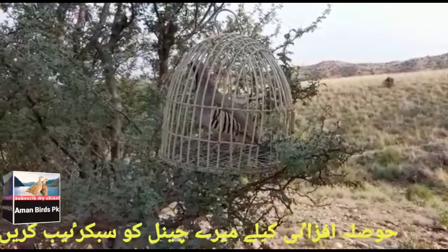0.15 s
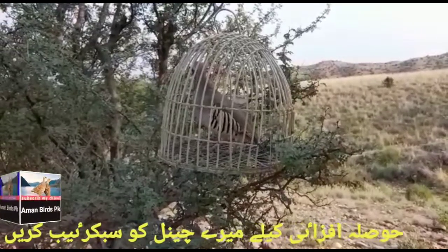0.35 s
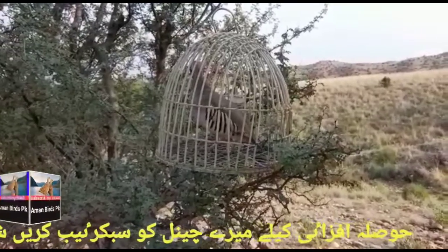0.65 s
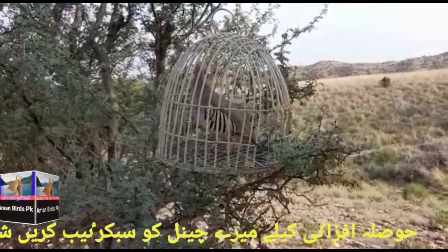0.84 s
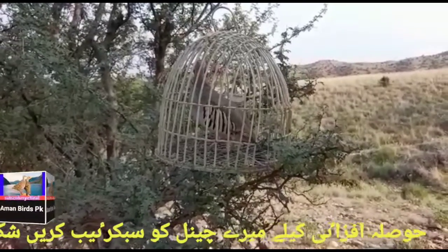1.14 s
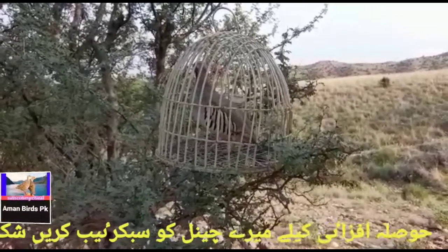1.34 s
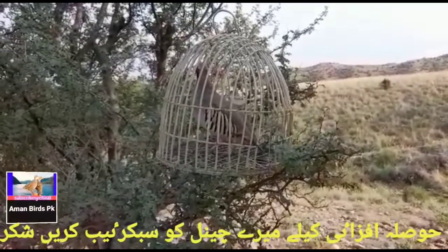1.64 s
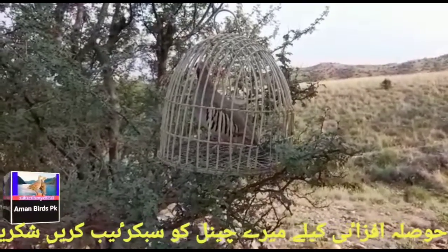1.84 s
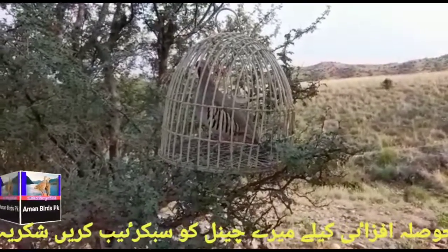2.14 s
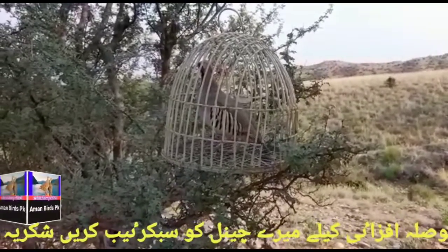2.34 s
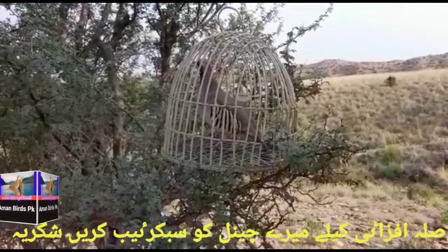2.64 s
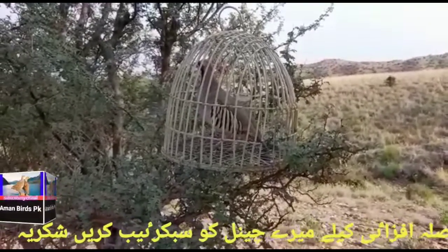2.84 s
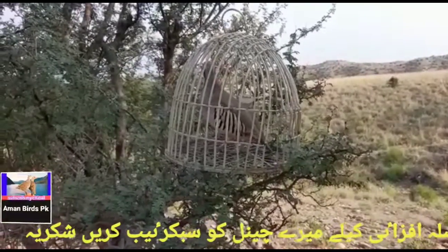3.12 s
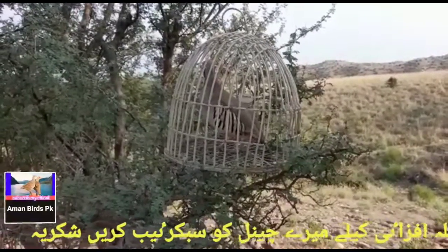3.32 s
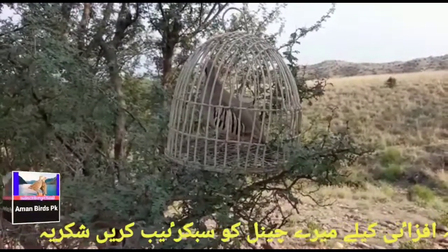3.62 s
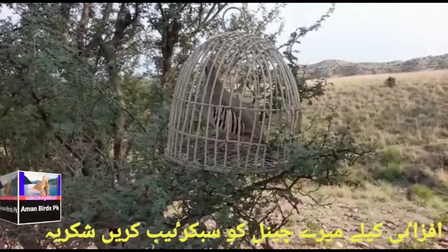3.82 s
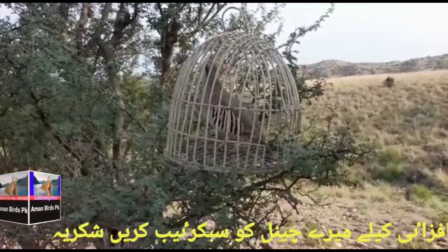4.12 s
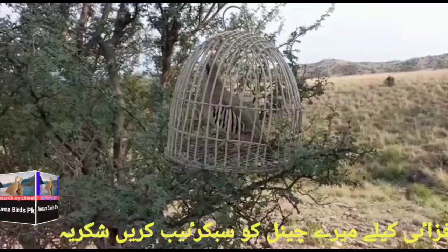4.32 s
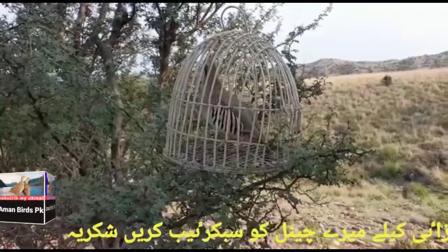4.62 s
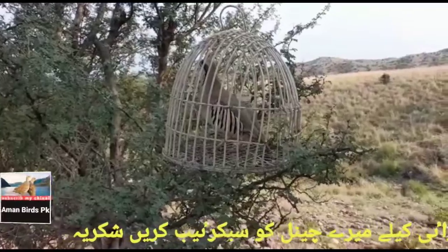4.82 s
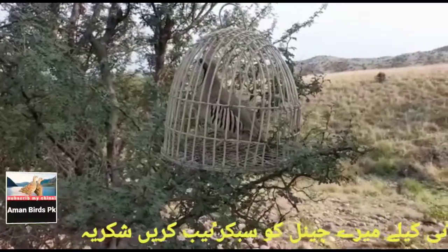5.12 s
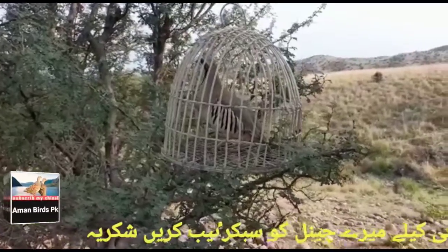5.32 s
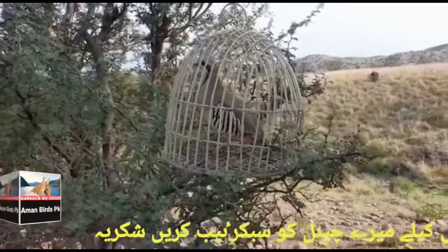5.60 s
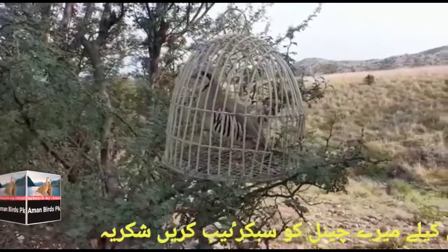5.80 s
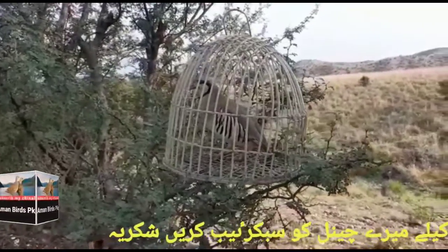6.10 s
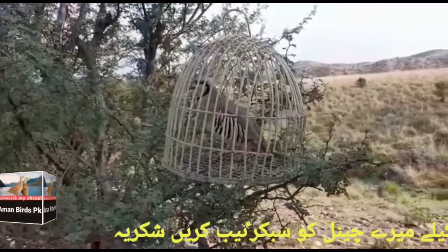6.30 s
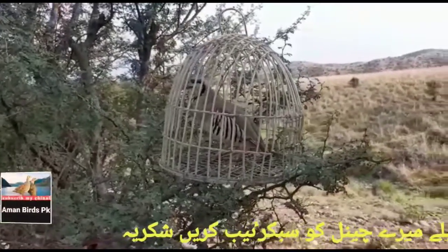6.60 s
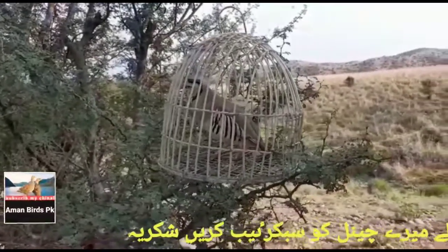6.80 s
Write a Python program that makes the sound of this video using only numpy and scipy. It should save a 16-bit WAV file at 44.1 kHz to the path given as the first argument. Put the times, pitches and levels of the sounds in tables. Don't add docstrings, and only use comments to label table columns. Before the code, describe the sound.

On an open hillside, a caged partridge very close on the right utters loud, rasping notes in a quick, regular rhythm, around six a second, growing hoarser and slightly overloading the microphone. A second partridge at middle distance clucks in pairs and broken notes, strong at first, then moving off and stopping. Thin small-bird whistles, faint far clucks and low wind puffs sit behind.

```python
import sys
import numpy as np
from scipy import signal
from scipy.fft import rfft, irfft, next_fast_len
from scipy.io import wavfile
from scipy.ndimage import uniform_filter1d, minimum_filter1d

SR = 44100
rng = np.random.default_rng(int(sys.argv[2]) if len(sys.argv) > 2 else 0)


def inscribe(sig):
    pcm = np.round(np.clip(np.atleast_2d(sig).T, -1, 1) * 32767)
    wavfile.write(sys.argv[1], SR, pcm.astype(np.int16))


def volts_from_db(level):
    exponent = np.asarray(level, float) / 20
    return 10 ** exponent


N = 306495
T = np.arange(N) / SR


def amp_one(x):
    return x / np.sqrt(np.mean(x ** 2) + 1e-20)


def butter(x, hz, kind, order=2):
    return signal.sosfilt(signal.butter(order, hz, kind, fs=SR, output="sos"), x)


def drift(rate_hz):
    settle = 9000
    return amp_one(butter(rng.standard_normal(N + settle), rate_hz, "low")[settle:])


def turns(hz):
    return 2 * np.pi * np.cumsum(hz * np.ones(N)) / SR


def resonance(x, hz, width_hz):
    carrier = np.exp(1j * turns(hz))
    band = butter(x / carrier, width_hz / 2, "low", order=3)
    return (band * carrier).real / np.sqrt(width_hz / SR)


def phrase(notes, attack_s, onset_db, fall_share, end_db):
    gain, rows = np.zeros(N), np.array(notes)
    for start_s, length, level_db, _, _, slope_db in notes:
        fall_s = length * (1 - fall_share)
        times = start_s + np.array([0, .003, attack_s, .3 * length, fall_s, length, length + .012])
        shape_db = [-60, -20, onset_db - slope_db, 1 - slope_db, 1 + slope_db, end_db, end_db - 35]
        span = slice(max(int(times[0] * SR), 0), int(times[-1] * SR))
        gain[span] += volts_from_db(level_db + np.interp(T[span], times, shape_db))
    row = np.maximum(np.searchsorted(rows[:, 0], T) - 1, 0)
    done = np.clip((T - rows[row, 0]) / rows[row, 1], 0, 1.2)
    return gain, done, rows[row].T


def syrinx(pitch_hz, clear, jitter, breath, limp):
    phase = turns(pitch_hz * (1 + jitter * drift(150)))
    cycle = np.floor(phase / (2 * np.pi))
    steady = clear * (1 + limp * drift(20) * (-1) ** cycle)
    chaos = np.sqrt(1 - np.clip(clear, 0, 1) ** 2) * rng.standard_normal(N)
    pulses = amp_one(np.diff(cycle, prepend=0) * (steady + chaos))
    return pulses + breath * rng.standard_normal(N), phase


def evened(x, share):
    power = uniform_filter1d(uniform_filter1d(x ** 2, size=120), size=120)
    return amp_one(x / np.sqrt(power + 0.00074) ** share)


def other_bird(notes, modes, low_db, second_db, hiss_db):
    gain, done, columns = phrase(notes, .006, onset_db=-5, fall_share=.4, end_db=-11)
    _, _, _, pitch, clear, _ = columns
    arch = 1.03 - .2 * (done - .25) ** 2 - .2 * done ** 4
    pulses, phase = syrinx(pitch * arch, clear=clear, jitter=.016, breath=.4, limp=.5)
    sink_hz = 380 * done ** 2.8
    rasp = sum(volts_from_db(mode_db) * resonance(pulses, hz - sink_hz, width_hz) for hz, width_hz, mode_db in modes)
    hiss = np.zeros(N)
    for band_hz, level_db in [([7900, 11000], -2), ([11500, 14600], 8)]:
        band = butter(rng.standard_normal(N), band_hz, "band", order=3)
        hiss += volts_from_db(level_db + 4.0 * drift(20)) * band
    tone = volts_from_db(low_db) * np.sin(phase) + volts_from_db(second_db) * np.sin(2 * phase)
    return gain * (evened(rasp, share=2 / 3) + tone + volts_from_db(hiss_db) * hiss)


def hillside(x, bush_db, slope_db):
    t = T[:SR // 2]
    bush = volts_from_db(bush_db - 60 * t / 0.073) * rng.standard_normal(len(t))
    slope = volts_from_db(slope_db - 60 * t / 2.0) * butter(rng.standard_normal(len(t)), 2800, "low")
    return x + signal.fftconvolve(x, bush + slope)[:N]


def weather():
    # start_s (peak time), level_db
    gusts = [
        (.1, -52),
        (.45, -72),
        (.8, -60),
        (1.05, -64),
        (6.95, -60),
    ]
    # band_hz, density_db (per Hz)
    air_colour = [(150, -25.5), (300, -6.5), (1600, -13), (2800, -2.5), (3400, -20.5), (5000, -15),
                  (15000, -32), (16000, -56.5)]
    # left_db, right_db
    air_sides_db = [-91.5, -69.5]
    breeze_db, breeze_db_per_s, fade_db_per_s = -85, -.6, 170
    flow = volts_from_db(breeze_db + breeze_db_per_s * T)
    for peak_s, peak_db in gusts:
        flow = flow + volts_from_db(peak_db - fade_db_per_s * np.abs(T - peak_s))
    wind = []
    for side in range(2):
        rumble = amp_one(butter(rng.standard_normal(N), [40, 95], "band", order=3))
        wind.append(volts_from_db(1.5 * drift(6)) * rumble)
    hz, density_db = np.transpose(air_colour)
    bins_hz = np.arange(N // 2 + 1) * SR / N
    colour = volts_from_db(np.interp(np.log(bins_hz + 1), np.log(hz), density_db))
    hush = [amp_one(irfft(rfft(rng.standard_normal(N)) * colour, N)) for side in range(2)]
    return flow * volts_from_db([[3], [-6]]) * wind + volts_from_db(np.c_[air_sides_db]) * hush


def answer_notes():
    # start_s, length_s, level_db, pitch_hz, slope_db (late minus early)
    lone = [
        (0, .031, -22, 504.5, -4.5),
        (2.604, .127, -38, 542.4, 2.5),
    ]
    # start_s, gap_s, level_db, pitch_hz
    pairs = [(0.54, .097, -26, 588), (1.093, .091, -28.5, 573), (1.682, .094, -29, 575),
             (2.267, .098, -33.5, 555), (2.941, .098, -43, 570), (3.622, .107, -39.5, 512),
             (3.982, .104, -40, 560), (4.336, .102, -39.5, 507), (4.694, .108, -40.5, 560)]
    # start_s, lead_s, level_db, lift_db (second half), pitch_hz
    swells = [
        (0.061, .028, -22, 2.5, 570),
        (0.3, .044, -31, 7.5, 590),
        (0.865, .039, -29, .5, 576),
        (1.427, .04, -33.5, 5.5, 576),
        (2.01, .043, -31.5, -1.5, 545),
        (3.281, .092, -39.5, 4, 538),
    ]
    notes = [(s, length, level_db, hz, .5, slope_db) for s, length, level_db, hz, slope_db in lone]
    pair_s, pair_lift_db, pair_clear, pair_slope_db = (.057, .059), 1.0, (.5, .6), (.3, 0.1)
    for s, gap, level_db, hz in pairs:
        levels_db = (level_db, level_db + pair_lift_db)
        notes += zip((s, s + gap), pair_s, levels_db, (hz, hz), pair_clear, pair_slope_db)
    overlap, second_s, swell_clear, swell_slope_db = 1.35, .044, (.4, .4), (1.5, .3)
    for s, lead, level_db, lift_db, hz in swells:
        lengths, levels_db = (overlap * lead, second_s), (level_db, level_db + lift_db)
        notes += zip((s, s + lead), lengths, levels_db, (hz, hz), swell_clear, swell_slope_db)
    return sorted(notes)


def answering_bird():
    # centre_hz, width_hz, level_db
    answer_modes = [(1670, 600, -4.5), (2730, 850, -18.5), (4060, 650, -20.5), (5290, 600, -16),
                    (6000, 2100, -35)]
    clucks = other_bird(answer_notes(), answer_modes, low_db=-12.5, second_db=-8.5, hiss_db=-31)
    return hillside(clucks, -39, -88)


def caged_notes():
    # start_s, level_db, throat_hz (at the start)
    pickups = [(0.929, -12, 1496), (1.413, -14, 1755), (1.913, -13.5, 1834), (2.417, -11, 1776),
               (2.916, -9, 1862), (3.431, -9.5, 1781), (3.962, -10.5, 1835), (4.496, -10, 1784),
               (5.029, -9.9, 1878), (5.579, -12, 1982), (6.131, -15, 1973), (6.735, -15, 1941)]
    # start_s, level_db, throat_hz (at the start)
    stresses = [(1.04, -13, 1664), (1.526, -12, 1693), (2.021, -10, 1660), (2.526, -7, 1773),
                (3.024, -9.5, 1835), (3.539, -8, 1848), (4.071, -8.5, 1785), (4.603, -9, 1862),
                (5.141, -6, 1927), (5.686, -7.5, 1932), (6.243, -11, 1937), (6.853, -10.5, 2013)]
    # start_s, level_db, throat_hz (at the start)
    closes = [(0.748, -14, 1803), (2.233, -10.5, 1835), (2.734, -10.5, 1932), (3.245, -9.5, 1905),
              (3.765, -9, 1894), (4.303, -9, 1889), (4.832, -10.5, 1954), (5.368, -11.5, 2013),
              (5.921, -12, 2024)]
    # start_s, length_s, level_db, throat_hz, slope_db (late minus early)
    loose = [(0.014, 0.065, -16.5, 1557, -8.4), (0.121, 0.041, -16, 1631, -0.2),
             (0.314, 0.056, -12.5, 1656, -1.9), (0.495, 0.066, -10, 1669, 1.5),
             (0.554, 0.053, -12, 1673, 0.2), (1.24, .066, -12.5, 1697, -2.3),
             (1.732, .059, -10.5, 1772, .5), (6.47, 0.069, -12, 2028, 1.8), (6.533, 0.043, -12.5, 1842, -1)]
    kinds = [(pickups, (.058, .0006, .0075, 0.0003, 1.6)),
             (stresses, (.078, .0008, .002, .0027, -.3)),
             (closes, (.063, .002, .015, .0001, -3.0))]
    notes = [(s, length, level_db, hz, 0, slope_db) for s, length, level_db, hz, slope_db in loose]
    for rows, (length, grows, whistle, clears, slope_db) in kinds:
        for s, level_db, hz in rows:
            notes.append((s, length + grows * s, level_db, hz, whistle + clears * s, slope_db))
    return sorted(notes)


def caged_bird():
    # start_s, pitch_hz, beak_hz, push_db (breath)
    bout = [(0, 560, 5250, -54), (.6, 559, 5135, -58), (.9, 558, 4450, -65), (2, 600, 4307, -48),
            (3, 642, 4504, -38), (5, 640, 4490, -36.5), (5.6, 638, 4806, -36), (6.3, 619, 4624, -35),
            (6.95, 619, 5180, -38)]
    # centre_hz, width_hz, level_db
    near_side_modes = [(2757, 250, -25), (6415, 1200, -44), (742, 546, -35.5)]
    times, *columns = np.transpose(bout)
    pitch, beak_hz, push_db = [np.interp(T, times, column) for column in columns]
    gain, done, note = phrase(caged_notes(), 0.0053, onset_db=-4, fall_share=0.26, end_db=-14)
    start, length, _, open_hz, whistle_s, _ = note

    glide = np.where(length < .073, .3, .13) * np.interp(T, [1.2, 2.4], [.45, 1])
    bend = .96 + glide * (1 - 2 * done) - .3 * done ** 7
    pulses, phase = syrinx(pitch * bend, clear=.84, jitter=.016, breath=.3, limp=.7)
    airy = .5 * pulses + rng.standard_normal(N)

    end_hz = 1400 + 20 * T
    bulge = 0.017 * np.sin(np.pi * np.minimum(done / .5, 1))
    throat_hz = open_hz * (1 + bulge + .035 * drift(30)) + (end_hz - open_hz) * done ** 1.04
    upper_db = np.interp(T, [0, 2.5, 4.5, 5.5], [-14.5, -10, -10.5, -6.5])
    throat = resonance(pulses, throat_hz, 486.0)
    throat = throat + volts_from_db(upper_db) * resonance(pulses, 1.3125 * throat_hz, 450.0)
    rasp = butter(throat, 1265, "high", order=4)

    raised_khz = (beak_hz - 4400) / 10 ** 3
    hoarse_s = (4.9, 5.5)
    beak_db = -17 - 9 * raised_khz - 16 * done ** 4
    shrill_db = -12 + 7 * raised_khz + np.interp(T, hoarse_s, (0, 7))
    hiss = resonance(airy, np.interp(T, hoarse_s, (4700, 4950)), 1550)
    rasp = rasp + volts_from_db(beak_db) * (resonance(pulses, beak_hz, 460.0) + volts_from_db(shrill_db) * hiss)
    for hz, width_hz, mode_db in near_side_modes:
        rasp = rasp + volts_from_db(mode_db) * resonance(airy, hz, width_hz)
    hum = volts_from_db(-27 + 4.5 * drift(60)) * np.sin(phase) + volts_from_db(-28.5) * np.sin(2 * phase)
    rasp = evened(rasp, share=.58) + hum

    clear = np.clip((start + whistle_s - T) / .004 + .3, 0, 1) * (whistle_s > .007) * (T > .7)
    sing = turns(open_hz * (1 + .012 * drift(42)))
    whistle = volts_from_db(4.5) * np.sin(sing) + volts_from_db(-26.5) * np.sin(2 * sing) + volts_from_db(-41) * np.sin(3 * sing)
    mixed = clear * whistle + volts_from_db(-.2) * (1 - 0.75 * clear) * rasp
    return gain * butter(mixed, 7200, "low", order=6), volts_from_db(push_db)


def small_bird():
    # start_s, length_s, top_hz, level_db
    whistles = [(0.108, .08, 4750, -64), (0.21, .09, 5030, -72), (0.395, .062, 4680, -71),
                (.6, .04, 4900, -70), (1.55, .1, 4957, -70), (1.965, .06, 4970, -62),
                (2.319, .062, 4900, -60), (2.79, .09, 5015, -70), (3.87, .014, 4323, -74),
                (3.9, .05, 4910, -84), (4.225, .08, 4900, -71), (5.77, .08, 5020, -68),
                (5.55, .048, 4150, -80.5), (5.87, .05, 4100, -82), (6.04, .07, 4250, -82),
                (6.43, .048, 3950, -79.5), (6.321, .099, 5000, -69), (6.668, .075, 4943, -69.5)]
    out = np.zeros(N)
    for start_s, length, top_hz, level_db in whistles:
        start_hz, end_hz = .925 * top_hz, .975 * top_hz
        u = np.linspace(0, 1, int(length * SR))
        rise = top_hz - (top_hz - start_hz) * (1 - u / .4) ** 2
        fall = top_hz - (top_hz - end_hz) * ((u - .4) / .6) ** 3
        tone = np.sin(2 * np.pi * np.cumsum(np.where(u < .4, rise, fall)) / SR)
        out[int(start_s * SR):][:len(u)] += volts_from_db(level_db) * np.sin(np.pi * u) ** .6 * tone
    return hillside(out * volts_from_db(1.5 * drift(40)), -34.5, -73)


def distant_bird():
    # start_s, level_db, pitch_hz
    far_clucks = [(2.18, -75.5, 631.5), (4.94, -77.5, 500), (5.28, -79, 496), (5.52, -79, 500),
                  (5.81, -77.5, 500), (6.02, -74.5, 500), (6.445, -86, 512), (6.585, -75, 560),
                  (6.68, -74.5, 520)]
    # centre_hz, width_hz, level_db
    distant_modes = [(1100, 540, 15), (2200, 500, -3.5)]
    length_s, clear, slope_db = .05, .7, 3.0
    notes = [(s, length_s, level_db, hz, clear, slope_db) for s, level_db, hz in far_clucks]
    return other_bird(notes, distant_modes, low_db=-2.5, second_db=1.0, hiss_db=-58.5)


def twig():
    # start_s, level_db (peak)
    ticks = [
        (5.009, -39.5),
    ]
    clicks = np.zeros(N)
    for start_s, level_db in ticks:
        clicks[int(start_s * SR):][:60] = volts_from_db(level_db - .5 * np.arange(60)) * rng.standard_normal(60)
    return butter(clicks, 6000, "low")


def scene():
    # start_s, balance_db (left minus right)
    answer_pan = [
        (0, 1),
        (1.8, 1),
        (2.4, -2),
        (5, -2.5),
    ]
    air = weather()
    answer = answering_bird()
    pan = volts_from_db(-np.interp(T, *np.transpose(answer_pan)))
    voice, push = caged_bird()
    near = hillside(voice, bush_db=-47, slope_db=-98)
    thud = volts_from_db(19) * push * butter(voice ** 2, [48, 98], "band", order=1)
    splash = volts_from_db(-50) * np.abs(voice) ** 4 * butter(rng.standard_normal(N), 10000, "high")
    spill = volts_from_db(-35 - 2.3 * T) * np.roll(butter(near, [1900, 5800], "band"), 18)
    whistles = small_bird()
    faint = distant_bird() + twig()
    left = spill + answer + faint + volts_from_db(np.interp(T, [0, 2], [-4, -12])) * whistles
    right = near + thud + splash + pan * np.roll(answer, 5) + volts_from_db(1) * faint + volts_from_db(1.0) * whistles
    return np.array([left, right]) + air


def band_limit(x):
    return signal.sosfilt(signal.butter(12, 15700, fs=SR, output="sos"), x)


def record(dry):
    envelope = np.abs(signal.hilbert(dry, next_fast_len(N))[:, :N])
    over_db = np.maximum(20 * np.log10(envelope + 1e-9) + .3, 0)
    held_db = uniform_filter1d(-minimum_filter1d(-over_db, size=41), size=41)
    limited = np.clip(dry * volts_from_db(-.92 * held_db), -1, 1)
    return band_limit(limited)


dry = scene()
out = record(dry)
inscribe(out)
```